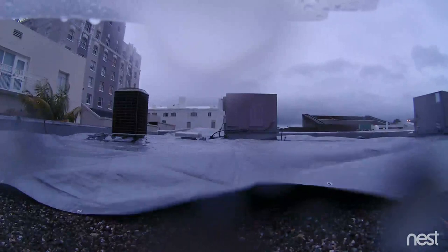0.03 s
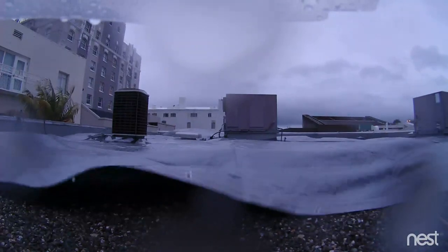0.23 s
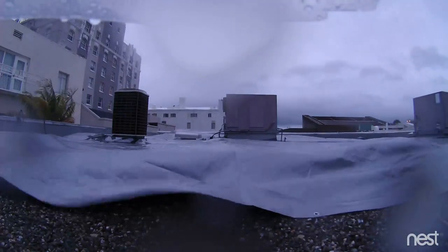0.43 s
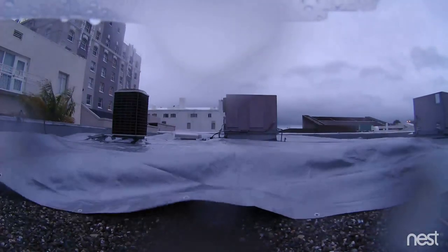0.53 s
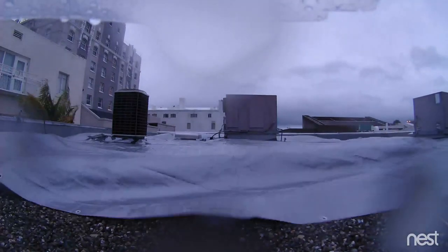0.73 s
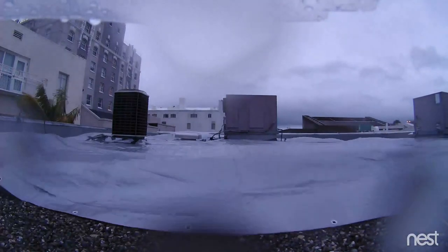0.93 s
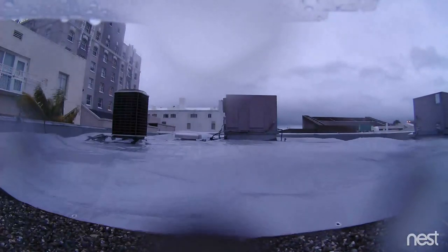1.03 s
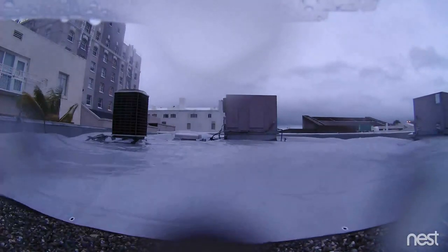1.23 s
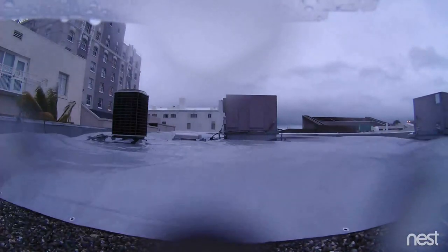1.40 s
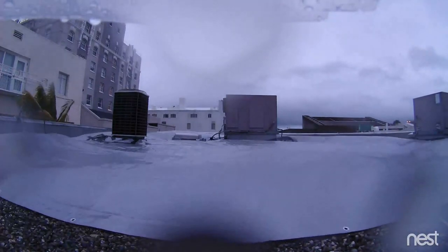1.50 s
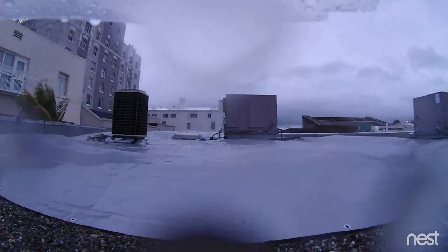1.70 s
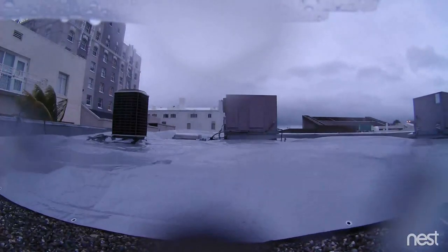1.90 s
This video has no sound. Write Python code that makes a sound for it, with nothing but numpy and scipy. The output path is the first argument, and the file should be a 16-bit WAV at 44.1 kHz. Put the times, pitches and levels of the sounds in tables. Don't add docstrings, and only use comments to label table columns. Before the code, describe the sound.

A heavy tarp flaps and snaps hard in gusty wind, then settles to faint rustling

```python
import sys
import numpy as np
from scipy import signal
from scipy.fft import rfft, irfft
from scipy.io import wavfile
from scipy.ndimage import uniform_filter1d

SR = 44100
rng = np.random.default_rng(int(sys.argv[2]) if len(sys.argv) > 2 else 0)


def digitize_waveform(pressure):
    field = np.atleast_2d(pressure).T
    bounded = np.clip(field, -1, 1)
    quanta = np.round(bounded * 32767).astype(np.int16)
    wavfile.write(sys.argv[1], SR, quanta)


def undo_db(level):
    steps = np.asarray(level, float) / 20
    return 10 ** steps


N = 85995

# t/s, level/dB
RUSTLE = [(0.0, -54.5), (0.228, -40.5), (0.32, -51), (0.65, -45), (0.792, -50.5), (0.878, -52),
          (1.086, -58.5), (1.298, -50), (1.422, -55), (1.95, -57)]


def evened(x):
    return x / np.sqrt(np.mean(x ** 2) + 1e-20)


def curve(points, t):
    return np.interp(t, *np.transpose(points))


def add(mix, s, sound):
    part = mix[max(round(s * SR), 0):][:len(sound)]
    part += sound[:len(part)]


def creases(count, per_s, pitch_hz):
    spread_db, low_slope, high_slope, sharp = 2.6, 1.3, 4.2, .75
    hit, size, sign = rng.random((count, 3)).T
    sizes = undo_db(-spread_db * np.log(size + .01))
    clicks = (hit < per_s / SR) * sizes * np.sign(sign - .6)
    u = np.fft.rfftfreq(count, 1 / SR) / pitch_hz
    colour = u ** low_slope / (1 + u ** (sharp * (low_slope + high_slope))) ** (1 / sharp)
    return evened(irfft(rfft(clicks) * colour, count))


def flap(start, length, level_db, pitch_hz):
    edge_s = .008
    lead = np.clip(start, 0, .02)
    t = np.arange(4096) / SR - lead
    rise = 1 / (1 + np.exp(-4 * t / edge_s))
    gate = rise / (1 + np.exp(4 * (t - length) / edge_s))
    sound = gate * creases(count=4096, per_s=2200, pitch_hz=pitch_hz)
    rms = np.sqrt((sound ** 2).sum() / (gate ** 2).sum())
    return start - lead, undo_db(level_db) * sound / rms


def snap(s, peak_db, pitch_hz):
    turns, tick_db, tick_up = .6, -12, 1.7
    u = np.arange(-220, 220) / SR * pitch_hz
    thump = -np.exp(-(u / turns) ** 2) * np.cos(2 * np.pi * u + rng.uniform(-0.35, 1.0))
    tick = np.exp(-(u * tick_up / turns) ** 2) * np.sin(2 * np.pi * u * tick_up)
    return s - len(u) / 2 / SR, undo_db(peak_db - 1.5) * (thump + undo_db(tick_db) * tick)


def tarp():
    # start t/s, length t/s, level/dB, crease f/Hz
    flap_events = [(.000, 0.022, -46, 453), (0.087, 0.012, -48, 600), (0.11, 0.025, -30, 768),
                   (0.133, 0.017, -32, 480), (0.186, 0.033, -26, 918), (0.209, 0.013, -24.5, 530),
                   (.228, 0.02, -26.5, 568), (0.247, .025, -35.5, 400), (0.301, 0.02, -41, 376),
                   (0.39, 0.044, -57, 450), (0.429, .026, -42.5, 500), (0.457, .025, -28.5, 670),
                   (.488, 0.033, -42.5, 503), (0.529, 0.022, -37.5, 550), (.546, 0.02, -33, 1053),
                   (0.569, 0.022, -38, 680), (0.591, 0.013, -43.5, 598), (0.621, 0.016, -41.5, 390),
                   (.660, 0.024, -42, 650), (0.717, 0.044, -43.5, 620), (0.755, 0.02, -42, 614),
                   (0.831, 0.011, -45.5, 476), (0.843, 0.017, -44.5, 420), (0.962, 0.01, -50, 450),
                   (1.078, 0.017, -44.5, 480), (1.098, 0.045, -40.5, 481.5), (1.147, .022, -46.5, 445),
                   (1.17, 0.024, -34.5, 660), (1.196, 0.043, -47.5, 535), (1.428, 0.057, -53, 417)]
    # start t/s, length t/s, level/dB, f/Hz
    crackle_events = [(.03, 0.049, -51, 2350), (0.11, 0.004, -27.5, 1500), (0.2, 0.0047, -29, 2550),
                      (.236, 0.014, -33, 1530), (.545, 0.019, -36, 1690), (0.14, 0.02, -41, 1500),
                      (.462, 0.02, -36, 1380), (.831, 0.0079, -51, 4800), (0.921, 0.01, -49, 2600),
                      (1.111, 0.009, -46.5, 5000), (1.13, 0.0064, -47, 2300), (1.609, 0.015, -52, 4900),
                      (1.809, 0.014, -49, 1250), (.188, 0.042, -33.5, 1300), (1.172, 0.026, -45, 1160),
                      (.845, 0.01, -45.5, 1400), (.429, 0.0067, -48.5, 1000), (0.53, 0.0049, -52, 890),
                      (1.439, .006, -59, 900), (0.74, 0.0091, -46.5, 700)]
    # t/s, peak level/dB, f/Hz
    snap_events = [(0.043, -37, 1820.0), (0.063, -39, 1400.0), (0.1117, -18, 820.0), (0.1254, -19, 610.0),
                   (0.1455, -21, 500.0), (0.1563, -22, 500.0), (0.1973, -11, 710.0), (0.2135, -16, 770.0),
                   (0.2197, -11, 570.0), (0.2404, -15, 710.0), (0.3918, -36, 480.0), (0.4716, -16, 800.0),
                   (0.4826, -20, 590.0), (0.5088, -29, 660.0), (0.5582, -14, 1040.0), (0.5642, -21, 600.0),
                   (0.5789, -23, 670.0), (0.6254, -29, 420.0), (0.665, -30, 630.0), (0.6828, -30, 690.0),
                   (0.7337, -32, 580.0), (0.7614, -27, 460.0), (0.8494, -29, 590.0), (1.111, -26, 560.0),
                   (1.1312, -31, 510.0), (1.1794, -23, 570.0), (1.1887, -25, 520.0), (1.2581, -37, 550.0),
                   (1.4414, -38, 430.0), (1.8972, -38, 460.0)]
    tail_db, tail_t60 = -14, .09
    direct = np.zeros(N)
    for row in flap_events + crackle_events:
        add(direct, *flap(*row))
    for row in snap_events:
        add(direct, *snap(*row))
    t = np.arange(6000) / SR
    tail = rng.standard_normal(6000) * undo_db(-60 * t / tail_t60) * (t > .003)
    scatter = signal.fftconvolve(direct, tail / np.linalg.norm(tail))[:N]
    return direct + undo_db(tail_db) * scatter


def rustle():
    # t/s, level/dB
    thin_folds = [(0, -14), (.3, -0.5), (.45, -4), (.7, 0), (.9, -8), (1.3, -10.5), (1.6, 0.5), (1.95, 3.5)]
    t = np.arange(N) / SR
    motion_db = curve(RUSTLE, t)
    thick = undo_db(motion_db - 4) * creases(count=N, per_s=2500, pitch_hz=420)
    thin_db = motion_db + curve(thin_folds, t) - 1.5
    return thick + undo_db(thin_db) * creases(count=N, per_s=4000, pitch_hz=920)


def patchy(spectrum, patchy_db, flicker_db):
    hz = np.fft.rfftfreq(1024, 1 / SR)
    a, b, p = rng.standard_normal((N // 256 + 5, 513, 3)).T
    drifting = uniform_filter1d(p, size=12, axis=0)
    patches = evened(uniform_filter1d(drifting, size=10, axis=1))
    flicker = evened(uniform_filter1d(p[0], size=3))
    f, db = np.transpose(spectrum)
    shape = np.interp(np.log(hz + 1), np.log(f + 1), db, -90, -90)[:, None]
    z = (a + 1j * b) * undo_db(shape + patchy_db * patches + flicker_db * flicker)
    return evened(signal.istft(z, nperseg=1024, noverlap=768)[1][:N])


def hiss():
    # t/s, level/dB
    gusts = [(0.0, -57.5), (0.042, -55), (0.244, -60), (0.39, -63), (0.678, -60.5), (1.09, -57),
             (1.466, -60), (1.95, -58)]
    # f/Hz, level per Hz/dB
    hiss_spectrum = [(410, -33), (700, -3.5), (1020, -7), (1480, -12.5), (2010, -9), (4640, -15.5),
                     (7190, -19.5), (9350, -56), (15800, -120)]
    t = np.arange(N) / SR
    return undo_db(curve(gusts, t) + 4) * patchy(hiss_spectrum, patchy_db=2, flicker_db=0.5)


def rumble():
    # f/Hz, level per Hz/dB
    rumble_spectrum = [(12, -61), (20, -24), (97, -13), (184, -16), (250, -1), (320, -21), (550, -120)]
    t = np.arange(N) / SR
    swell_db = 0.73 * (curve(RUSTLE, t) + 52)
    return undo_db(swell_db - 65.5) * patchy(rumble_spectrum, patchy_db=3.0, flicker_db=7)


def scene():
    return (tarp() + rustle() + hiss() + rumble())[None]


def starve(x, size, bins, frames, lasting, need):
    hz, t, z = signal.stft(x, SR, nperseg=size, noverlap=size * 3 // 4)
    draw = rng.standard_normal((len(t) + 1, len(hz))).T
    chance = lasting * draw[:, :1] + np.sqrt(1 - lasting ** 2) * draw[:, 1:]
    chance = chance[np.arange(len(hz)) // bins][:, np.arange(len(t)) // frames]
    energy = uniform_filter1d(abs(z) ** 2, bins, axis=0)
    energy = uniform_filter1d(energy, frames, axis=1)
    level_db = 10 * np.log10(abs(energy) + 1e-20)
    excess_db = level_db - np.median(level_db, axis=1)[:, None] - 6
    loud = np.maximum(excess_db, 0) / 5 / (1 + (hz[:, None] / 3600) ** 6)
    keep = chance + need(hz[:, None], t) - loud < .05
    gated = z * (keep + undo_db(-45))
    return signal.istft(gated, SR, nperseg=size, noverlap=size * 3 // 4)[1][:N]


def spectral_gaps(x):
    # from t/s, f/Hz
    band_tops = [(0, 7300), (.11, 6640), (.2, 6500), (0.831, 7450), (.94, 6980), (1.13, 6830), (1.23, 7000),
                 (1.39, 6730), (1.55, 7550), (1.65, 7000), (1.81, 7240)]
    # start t/s, end t/s, hunger (threshold shift)
    coarse_spells = [
        (.105, .215, 1.5),
        (.41, .6, 1.38),
        (1.11, 1.175, 1.3),
    ]
    starts, tops = np.transpose(band_tops)

    def hunger(s):
        return sum(h * (s > a) * (s < b) for a, b, h in coarse_spells)

    def narrow_need(hz, s):
        return np.minimum(.9 * np.log2(hz / 2800 + .01), .15) - 1.5 * hunger(s)

    def coarse_need(hz, s):
        above_top = hz > tops[np.searchsorted(starts[1:], s)]
        return 99 * above_top - 4.5 + 3.2 * hunger(s) + .6 * np.log2(hz / 4000 + .01)

    x = starve(x, size=4096, bins=4, frames=5, lasting=.5, need=narrow_need)
    x = starve(x, size=512, bins=5, frames=5, lasting=0, need=coarse_need)
    return signal.sosfilt(signal.ellip(10, .1, 70, 7500, fs=SR, output="sos"), x)


def low_pass(x):
    return signal.sosfilt(signal.butter(12, 7340, fs=SR, output="sos"), x)


def record(dry):
    bass_cut = signal.butter(1, 139, "high", fs=SR, output="sos")
    x = spectral_gaps(signal.sosfilt(bass_cut, dry[0]))
    return low_pass(x[None])


dry = scene()
out = record(dry)
digitize_waveform(out)
```